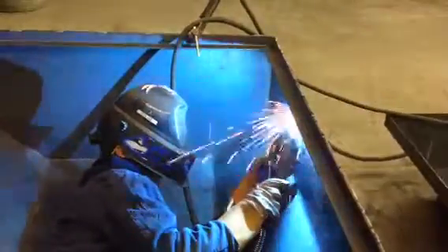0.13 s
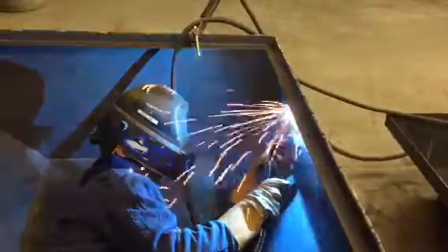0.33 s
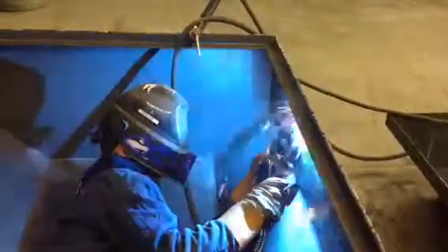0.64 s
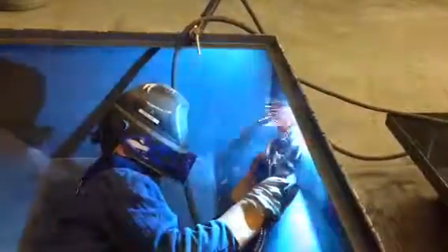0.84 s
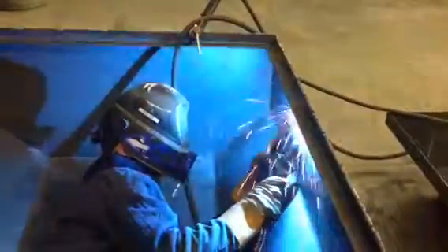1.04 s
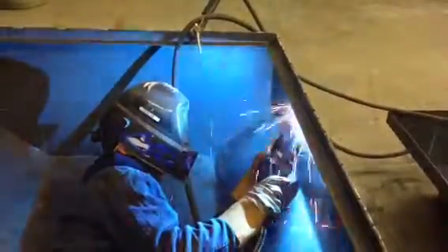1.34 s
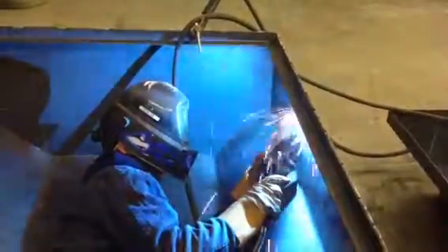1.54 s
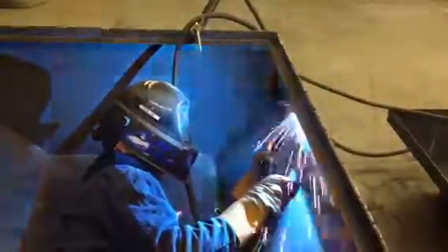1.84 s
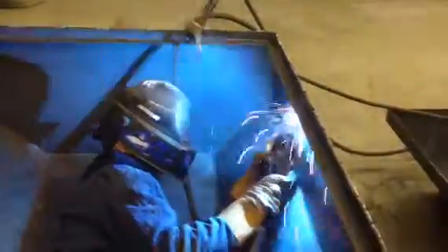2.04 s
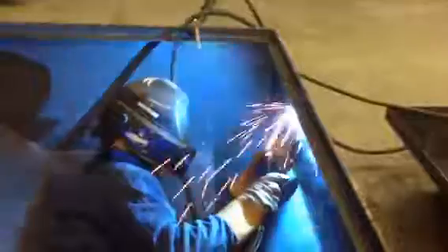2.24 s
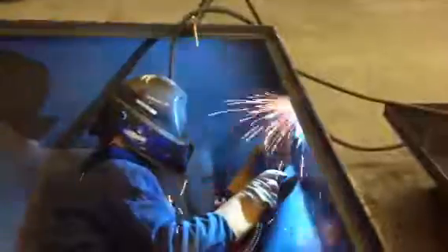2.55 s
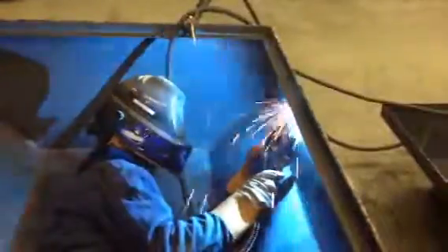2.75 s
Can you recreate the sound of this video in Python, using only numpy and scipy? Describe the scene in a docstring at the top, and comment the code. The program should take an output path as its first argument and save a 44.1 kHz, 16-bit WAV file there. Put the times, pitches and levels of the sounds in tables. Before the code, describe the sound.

Wire welding runs almost continuously, its fast raspy popping surging, thinning briefly near two seconds, then returning strong and weakening at the end; metallic ring, workshop reverberation and soft fan rumble through a small camera microphone.

```python
"""A welding arc crackles inside a steel bin: the wire shorts and the arc strikes again with a pop, some 45-100 a second.
Each pop is an impulse that bounces off the near steel walls, sets the sheets ringing and then rings round the shop.
Under the pops lie a fluttering sizzle and the hiss of shielding gas, both made of noise.
Below them the cooling fan drones: a low rush of air with wavering tones.
A small camera microphone with notches in its treble and a sharp upper band limit hears it all."""
import sys
import numpy as np
from scipy import signal
from scipy.fft import rfft, irfft, next_fast_len
from scipy.io import wavfile
from scipy.ndimage import uniform_filter1d, map_coordinates

SR = 44100
rng = np.random.default_rng(int(sys.argv[2]) if len(sys.argv) > 2 else 0)


def materialize(psi):
    """Save the field psi as 16-bit PCM at rate SR to the path in sys.argv[1].

    A 1-D psi becomes a single channel; in a 2-D psi each row is a channel.
    """
    bounded = np.clip(np.atleast_2d(psi).T, -1, 1)
    quanta = np.round(bounded * 32767).astype(np.int16)
    wavfile.write(sys.argv[1], SR, quanta)


N = 127890

# the run of ordinary pops: (time [s], rate [pops/s], level [dB], extra treble [dB])
POP_RUN = [(0, 48, -8, -1), (.12, 66, -3, -2), (.24, 72, -2, 1), (.37, 66, -7.5, 2.5), (.5, 60, -5.5, 1),
           (0.601, 55, -8.5, -0.5), (.72, 85, -6.5, 2), (.85, 102, -2, -3), (.98, 96, -3, -1.5),
           (1.06, 90, -1, -4.5), (1.14, 86, -4.5, -1), (1.35, 100, -3, -0.5), (1.548, 88, -2, -1.5),
           (1.751, 72, -6, 1), (1.941, 68, -8, 1), (1.96, 45, -24, 7.5), (2, 50, -11, 0),
           (2.019, 70, -4.5, 0), (2.081, 72, -1, -1.5), (2.201, 72, -1.5, -2.5), (2.33, 60, -6.5, 1),
           (2.39, 60, -7, -1), (2.602, 65, -10.5, 2.5), (2.75, 85, -3, -2.5), (2.849, 60, -11.5, 3.5),
           (2.88, 60, -31, 2.5)]
# edges between the body, ring and treble bands of the arc: (frequency [Hz])
BAND_EDGES = [5000, 7200]
# colour of arc and microphone together: (frequency [Hz], relative density [dB per Hz])
ARC_COLOUR = [(350, -24.5), (600, -20.5), (745, -3), (876, -4.5), (1230, -8.5), (1530, -1.5), (1610, 5.5),
              (1720, -7), (2030, 5), (2350, -3.5), (2550, 3), (2770, -5), (3530, -4.5), (3880, -17.5),
              (4620, -17), (5010, -30), (5510, -20), (6060, -2), (6940, -7), (8160, -9), (9860, -0.5),
              (11000, -3.5), (12400, -9.5), (13300, -19.5), (15200, -11.5)]


def amp(db):
    """dB to gain."""
    return 10 ** (np.asarray(db) / 20)


def unit(x):
    """Scaled to rms 1."""
    return x / np.sqrt(np.mean(x ** 2) + 1e-20)


def along(points, hz):
    """Value at each frequency, from (Hz, value) points joined on a log axis."""
    f, v = np.transpose(points)
    return np.interp(np.log(hz + 1), np.log(f + 1), v)


def over_time(points):
    """Value at each sample, from (s, value) points joined by straight lines."""
    return np.interp(np.arange(N) / SR, *np.transpose(points))


def wobble(rate):
    """A smooth random curve, rate knots a second."""
    knots = rng.standard_normal(int(N * rate / SR) + 4)
    return map_coordinates(knots, [np.arange(N) * rate / SR])


def filtered(x, response):
    """x times a response of frequency."""
    m = next_fast_len(len(x) + 8192)
    hz = np.fft.rfftfreq(m, 1 / SR)
    return irfft(rfft(x, m) * response(hz), m)[:len(x)]


def causal(gain, size=4096):
    """Minimum-phase impulse response with these gains, by folding the cepstrum forward."""
    cepstrum = irfft(np.log(gain + 1e-6), size)
    cepstrum[1:size // 2] *= 2
    cepstrum[size // 2 + 1:] = 0
    return irfft(np.exp(rfft(cepstrum)), size)


def pops(lead):
    """Impulse train of arc strikes: ordinary pops fill each gap between the marked ones at the running rate."""
    # single pops, strong to nearly silent: (time [s], level [dB])
    marked = [(0.0227, -0.5), (0.044, -6), (0.0634, 0.5), (0.132, 3.5), (0.1458, 6.5), (0.1856, 0),
              (0.1993, 2.5), (0.2086, 3), (0.2188, 4), (0.2408, 8), (0.271, 3), (0.3122, -2.5), (0.3275, 1),
              (0.3446, 0.5), (0.3724, -4), (0.3862, -2.5), (0.449, 1), (0.4969, 0), (0.5191, 4.5),
              (0.56, -9), (0.634, -2.5), (0.667, -6.5), (0.687, -6.5), (0.7282, -3.5), (0.7757, -2),
              (0.839, -4), (0.8649, -4.5), (0.894, -3), (0.9233, 4), (0.9625, 0.5), (0.987, 0), (1.014, -2),
              (1.0482, 2), (1.059, 0), (1.0806, 1.5), (1.093, -4), (1.118, -1), (1.131, -4), (1.152, 2),
              (1.184, 0.5), (1.196, 0), (1.216, -2), (1.23, -3), (1.2533, 3), (1.277, 4.5), (1.293, -2),
              (1.3339, -7), (1.363, -1.5), (1.389, 0.5), (1.423, 0.5), (1.456, -3), (1.501, -1),
              (1.5478, -7), (1.5738, 2.5), (1.584, -3), (1.598, 0), (1.631, 0), (1.653, -0.5), (1.685, -2),
              (1.719, -3.5), (1.795, -4.5), (1.84, -1.5), (1.894, -7), (1.9469, -8.5), (1.976, -5),
              (1.9974, -3.5), (2.0678, 0.5), (2.0911, 2.5), (2.125, 2.5), (2.1411, 3), (2.1566, 3),
              (2.1799, 1.5), (2.2198, 2), (2.2454, 1), (2.2701, 0.5), (2.2923, 1), (2.3107, 0.5),
              (2.3344, 2), (2.3508, 7), (2.37, -37), (2.4699, -1.5), (2.5051, -4.5), (2.551, -4.5),
              (2.627, -13), (2.65, -2.5), (2.6694, -4.5), (2.693, -1), (2.7262, 0), (2.793, -8),
              (2.8063, -2), (2.859, -4.5)]
    jitter, scatter_db = .2, 1.43  # timing spread as a share of the spacing; size spread
    s, rate, level, _ = np.transpose(POP_RUN)
    marks = [-lead / SR] + [t for t, _ in marked]
    events = list(marked)
    for a, b in zip(marks, marks[1:]):
        draw = rng.standard_normal((40, 2))
        steps = max(round((b - a) * np.interp((a + b) / 2, s, rate)), 1)
        for i in range(1, steps):
            t = a + (b - a) * (i + jitter * draw[i, 0]) / steps
            events.append((t, np.interp(t, s, level) + scatter_db * draw[i, 1]))
    t, db = np.transpose(events)
    index = np.clip(np.round(t * SR).astype(int) + lead, 0, None)
    return np.bincount(index, amp(db), N + lead)[:N + lead]


def sizzle(lead):
    """Hiss of the burning arc: noise that swells with the run of pops and flutters."""
    level_db, flutter_db = -35, 2.5
    s, _, level, _ = np.transpose(POP_RUN)
    swell = np.interp(np.arange(N) / SR, s, level - level.mean()) + flutter_db * wobble(70)
    gain = np.pad(amp(level_db + swell), (lead, 0), "edge")
    return gain * rng.standard_normal(N + lead)


def steel_bin(place, size=4096):
    """Impulse response of energy 1 for a torch place -1..1: wall paths, dense scatter and ringing sheets."""
    # paths from the arc off the walls, relative levels:
    # (delay at mid seam [ms], body [dB], ring band [dB], treble [dB])
    paths = [(0, 2, 10.5, 2.5), (.6, 3, 8, -2), (1.1, 1.5, 4.5, 3.5), (2.1, 8.5, 9, -5.5),
             (2.6, 7.5, 11, -5), (3.3, -8.5, 2, -5), (3.8, 5.5, 13.5, -4), (4.2, 11.5, -20, -7),
             (4.75, -1, 0, 16), (5.5, 9, 7.5, -10), (6.2, 0.5, -4, 17), (7, 7, -14, -1),
             (8.1, 2.5, -13, -13)]
    # ringing of the steel sheets: (frequency [Hz], width [Hz], boost [dB])
    sheet_modes = [(1297, 28, 14.5), (1440, 8.3, 9.5), (1487, 6.6, 12.5), (1568.4, 34, 8.5),
                   (1805, 18, 3.5), (2080, 79, 5), (2130, 22, 0), (2223, 25, 7), (2626, 43, 2.5),
                   (6187, 240, 2.5), (8160, 300, 8.5)]
    travel = .015  # share by which the paths stretch as the torch moves along the seam
    scatter_db, rise_s = -5, .005  # scatter against the wall paths; time constant of its build-up
    t60_body, t60_treble = 0.058, 0.059  # s; the second also serves the ring band

    hz, t = np.fft.rfftfreq(size, 1 / SR), np.arange(size) / SR
    band = np.searchsorted(BAND_EDGES, hz)
    walls = 0
    for ms, body, ring, treble in paths:
        delay = ms * (1 + travel * place) / 1000
        walls = walls + amp([body, ring, treble])[band] * np.exp(-2j * np.pi * hz * delay)

    noise = rng.standard_normal(size) * (1 - np.exp(-t / rise_s))
    body_scatter = rfft(noise * amp(-60 * t / t60_body))
    treble_scatter = rfft(noise * amp(-60 * t / t60_treble))
    scatter = np.where(band == 0, body_scatter, treble_scatter)

    # each spectrum is levelled over 40 bins, so the arc colour alone sets the broad balance
    level = lambda z: np.sqrt(uniform_filter1d(np.abs(z) ** 2, size=40))
    both = walls / level(walls) + amp(scatter_db) * scatter / level(scatter)
    sheets = np.ones(len(hz))
    for c, w, db in sheet_modes:
        sheets = sheets * (1 + (amp(db) - 1) * w * w / (w * w + 4 * (hz - c) ** 2))
    colour = rfft(causal(amp(along(ARC_COLOUR, hz)) * sheets))
    ir = irfft(both / level(both) * colour, size)
    return ir / np.linalg.norm(ir)


def shop(x):
    """Long tail of the workshop, 600 samples behind the arc; each frequency dies at its own speed."""
    # decay of the room: (frequency [Hz], time to fall 60 dB [s])
    decay = [(500, 3.5), (2000, 0.48), (6000, 0.3), (14000, 0.21)]
    hz, t, z = signal.stft(rng.standard_normal(SR), SR, nperseg=256)
    fading = z * amp(-60 * t / along(decay, hz)[:, None])
    tail = signal.istft(fading, SR, nperseg=256)[1]
    return signal.fftconvolve(np.pad(x, (600, 0)), tail / np.linalg.norm(tail))[:len(x)]


def seam_sheet(heard):
    """What the sheet next to the seam adds or takes: a narrow resonance with a moving gain."""
    # how much the sheet stands out: (time [s], gain [dB])
    standing_out = [(.3, -7), (.44, 12.5), (.52, -5), (1.84, 1), (1.9, 12), (1.98, -7.5), (2.421, -1.5),
                    (2.52, 9.5), (2.72, 7), (2.8, -4)]
    f0, width = 1580, 45  # Hz
    resonance = lambda hz: 1j * hz * width / (f0 ** 2 - hz ** 2 + 1j * hz * width)
    return (amp(over_time(standing_out)) - 1) * filtered(heard, resonance)


def arc():
    """Pops and sizzle heard through the bin, whose response changes as the torch travels, and the shop."""
    shop_db = -11.5
    lead = SR // 3  # the arc already burns before the start, so the bin and shop are ringing
    source = pops(lead) + sizzle(lead)
    place, near = np.linspace(-1, 1, N + lead), 0
    for stop in np.linspace(-1, 1, num=9):
        # equal-power crossfade between neighbouring torch places
        share = np.cos(np.pi * np.clip(2 * (place - stop), -.5, .5))
        near = near + signal.fftconvolve(share * source, steel_bin(stop))[:N + lead]
    heard = (near + amp(shop_db) * shop(near))[lead:]
    top = filtered(heard, lambda hz: hz > min(BAND_EDGES))
    s, _, _, treble = np.transpose(POP_RUN)
    extra_treble = (amp(np.interp(np.arange(N) / SR, s, treble)) - 1) * top
    return heard + seam_sheet(heard) + extra_treble


def gas():
    """Shielding gas from the nozzle: hiss of turbulent flow, its level drifting slightly."""
    # balance of the hiss, on top of the arc colour: (frequency [Hz], relative level [dB])
    balance = [(1000, 5), (3000, -6), (8000, -21), (12000, 10), (15000, -16)]
    level_db = -49
    shape = lambda hz: amp(along(balance, hz) + along(ARC_COLOUR, hz))
    return amp(level_db + wobble(3.8)) * unit(filtered(rng.standard_normal(N), shape))


def fan():
    """Cooling fan: a slightly lumpy low rush of air with blade and shaft tones, unsteady in pitch and level."""
    # rush of air: (frequency [Hz], relative density [dB per Hz])
    air = [(30, -9), (60, -10), (85, -24), (130, -0.5), (200, 2.5), (300, -1), (500, -6), (900, -13.5),
           (1500, -4.5), (3000, -17), (6000, -38)]
    # blade and shaft tones: (frequency [Hz], level before a common 1 dB lift [dB])
    tones = [(88, -49.5), (135, -46.5), (178, -43.5), (222, -38.5), (269, -39.5), (385, -50.5)]
    # swell of the whole drone: (time [s], level [dB])
    drone_swell = [(1.25, 0.5), (1.6, 1.5), (1.85, 0.5)]
    air_db, throb_db = -30.5, .6
    waver_hz, tone_flutter_db = 4.45, 2.74

    t = np.arange(N) / SR
    rush = unit(filtered(rng.standard_normal(N), lambda hz: amp(along(air, hz))))
    hum = 0
    for hz, db in tones:
        level = amp(db + 1 + tone_flutter_db * wobble(12))
        drift = np.cumsum(waver_hz * wobble(14)) / SR
        hum = hum + level * np.sin(2 * np.pi * (hz * t + drift + rng.random()))
    lumpy_rush = amp(air_db + throb_db * wobble(5.9)) * rush
    return amp(over_time(drone_swell)) * (lumpy_rush + hum)


def scene():
    """Arc, gas and fan, one channel."""
    return (arc() + gas() + fan())[None]


def record(dry):
    """The camera microphone cuts the bass, has notches, rolls off near the top and stops at its band limit."""
    # notches of the microphone housing: (frequency [Hz], width [Hz], share left [ratio])
    notches = [(5030, 320, .03), (9820, 1930, 0.17), (12000, 1500, .25)]
    low_cut_hz, low_leak_db = 78, -26  # the leak passes at every frequency
    edge_hz, top_hz, edge_db = 15300, 15880, -26  # drops by edge_db at the edge, by twice that at the top

    def response(f):
        notch = 1
        for c, w, left in notches:
            notch = notch * (1 - (1 - left) * 1j * f * w / (c * c - f * f + 1j * f * w))
        cut = 1 / (1 + (low_cut_hz / (f + 1)) ** 10) + amp(low_leak_db)
        slope_db = edge_db * (1 + (f - edge_hz) / (top_hz - edge_hz))
        edge = amp(np.where(f < edge_hz, 0, slope_db)) * (f < top_hz)
        return notch * cut * edge

    margin = SR // 4  # mirrored sound ahead and behind keeps the filter from clicking at the ends
    padded = np.pad(dry[0], margin, "reflect")
    return filtered(padded, response)[None, margin:margin + N]


dry = scene()
out = record(dry)
materialize(out)
```